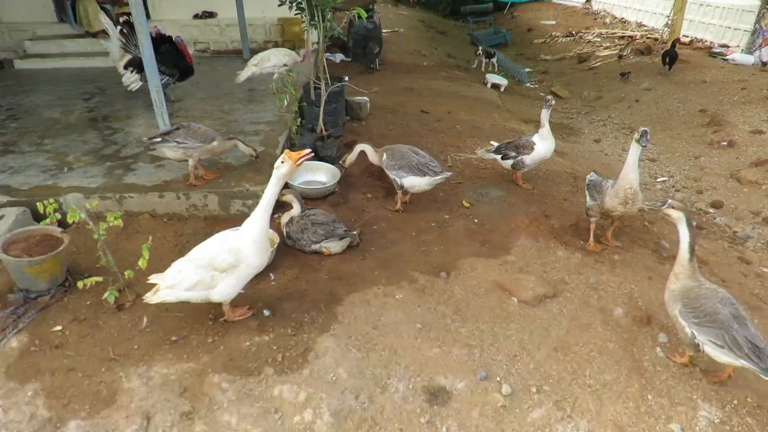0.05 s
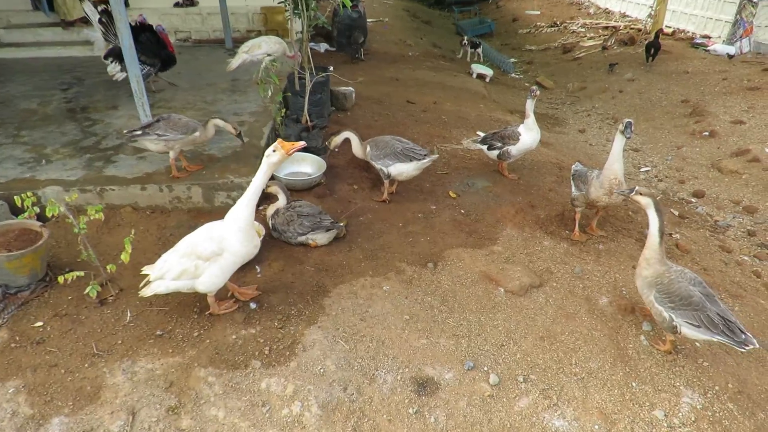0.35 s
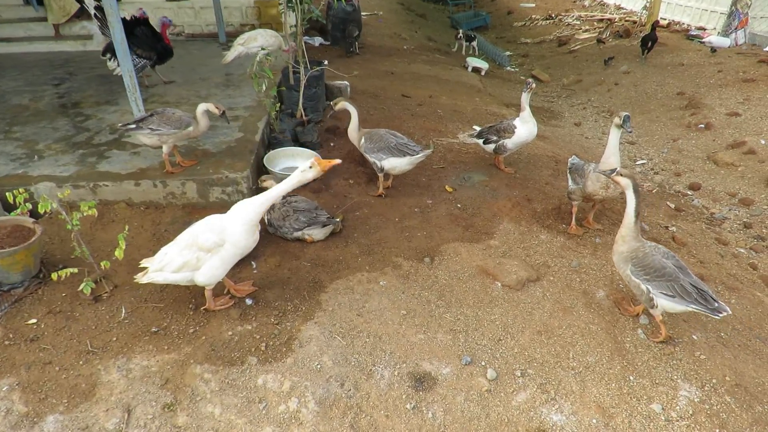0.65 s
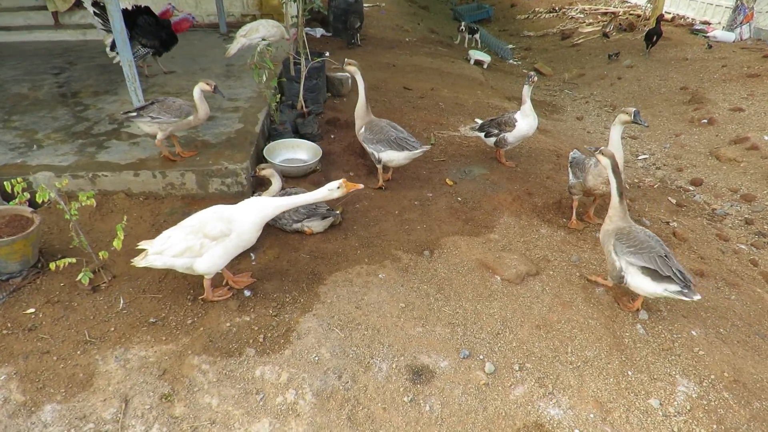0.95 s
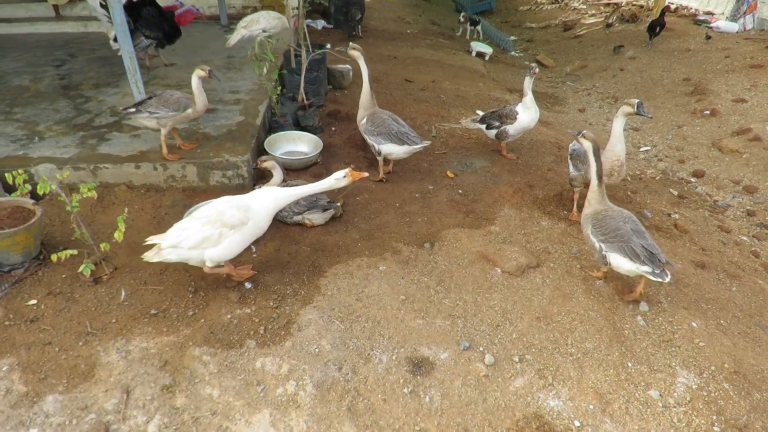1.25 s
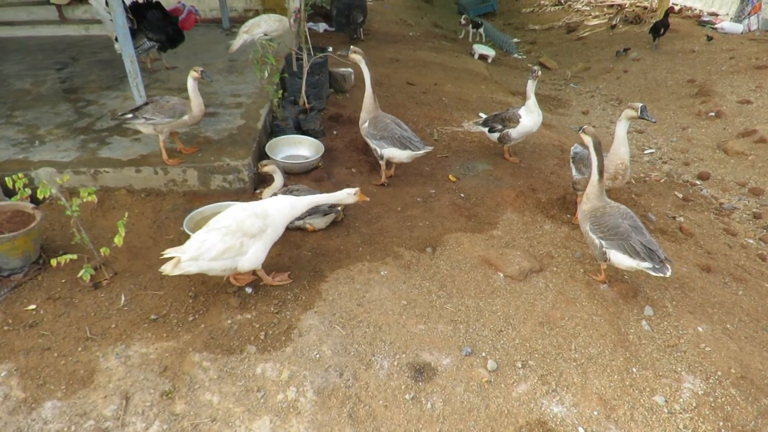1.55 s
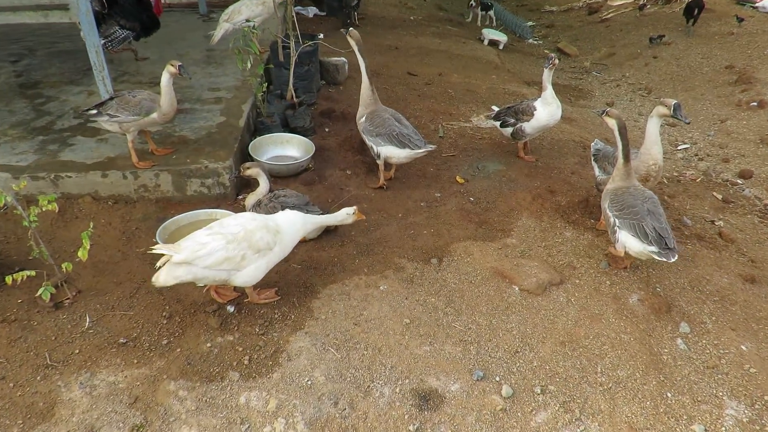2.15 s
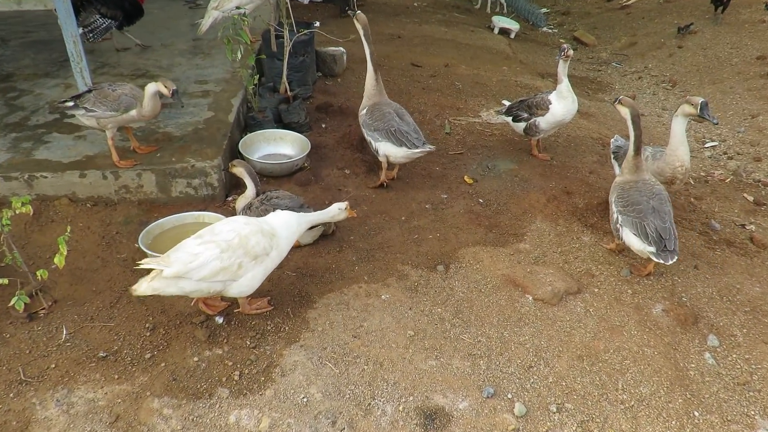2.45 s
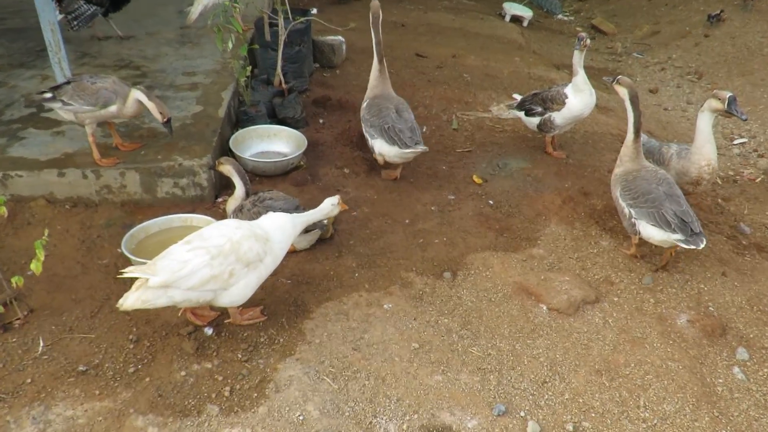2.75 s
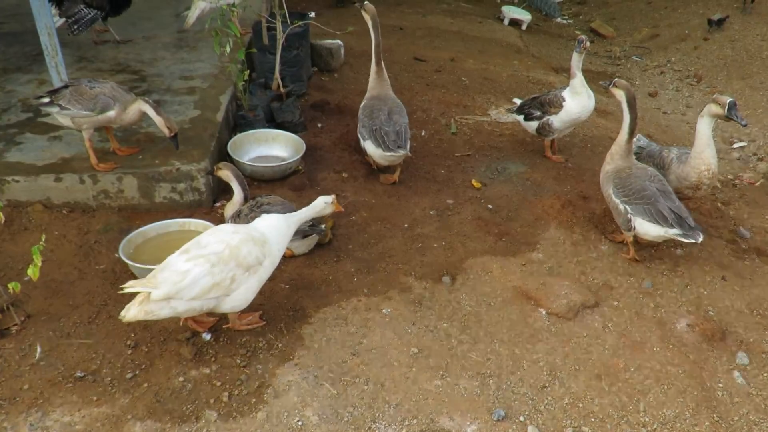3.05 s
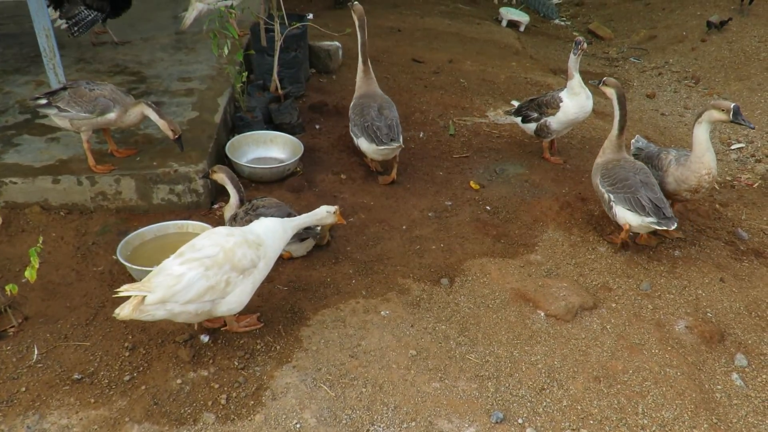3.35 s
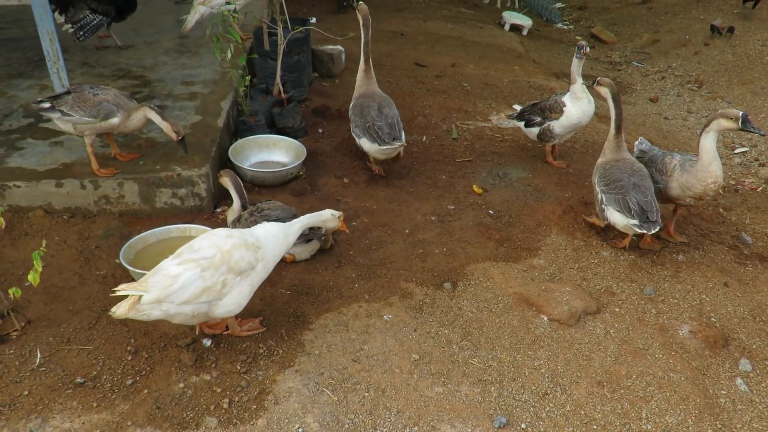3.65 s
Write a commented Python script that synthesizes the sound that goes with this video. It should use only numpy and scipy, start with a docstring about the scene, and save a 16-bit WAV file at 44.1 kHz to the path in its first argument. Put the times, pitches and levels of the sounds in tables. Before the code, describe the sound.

Geese quarrel a few metres away over a low farmyard hum. A grunt breaks into a shriek, clearing to a honk at 0.6 seconds, then a rasp and soft clucks until 1.4. A thin squeak at 1.7 opens a wheezy hiss lasting until 3.3. Hoarse honks come at 2.1 and 3.2 seconds, with two short peeps between them. A small bird whistles faintly twice near the end.

```python
"""Geese quarrel a few metres away, over the murmur and low hum of a farmyard. One grunts, breaks into
a shriek that clears to a honk, and trails off in a rasp and soft clucks: membrane pulses and puffs of air
ringing in the throat. A thin squeak opens a long wheezy hiss, air rushing through an open beak.
A hoarse honk sounds over it, two short peeps cut through, and a second hoarse honk comes as the hiss dies.
A small bird whistles at the end."""
import sys
import numpy as np
from scipy import signal
from scipy.fft import rfft, irfft
from scipy.io import wavfile
from scipy.ndimage import uniform_filter1d, map_coordinates

SR = 44100
rng = np.random.default_rng(int(sys.argv[2]) if len(sys.argv) > 2 else 0)


def wrap_up_sound(samples):
    """Save the sound to the file named by the first command line argument, as 16-bit audio."""
    columns = np.atleast_2d(samples).T
    # keep every value between -1 and 1, then stretch to whole-number steps
    tamed = np.clip(columns, -1, 1)
    steps = np.round(tamed * 32767).astype(np.int16)
    wavfile.write(sys.argv[1], SR, steps)


N = 171990
T = np.arange(N) / SR
TOP_HZ = 15400


def amp(db):
    """Decibels to gain."""
    return 10 ** (np.asarray(db) / 20)


def unit(x):
    """Scales to rms 1."""
    return x / np.sqrt(np.mean(x ** 2) + 1e-20)


def read(points, hz):
    """Reads a curve on a log-frequency axis."""
    f, value = np.transpose(points)
    return np.interp(np.log(hz + 1), np.log(f + 1), value)


def follow(rows, fade_s=0.0045):
    """Breakpoints to automation: the times spanned, a soft-ended gate and a curve per column."""
    s, *columns = np.transpose(rows)
    t = np.arange(s[0], s[-1], 1 / SR)
    gate = np.clip(np.minimum(t - t[0], t[-1] - t) / fade_s, 0, 1)
    return t, gate, *[np.interp(t, s, c) for c in columns]


def place(t, sound):
    """Sets a sound at its time in silence."""
    return np.pad(sound, (max(round(t[0] * SR), 0), N))[:N]


def wander(size, hz):
    """Random modulation of rms about 1, rolling off above the given rate."""
    z = rfft(rng.standard_normal(SR * 2))
    bin_hz = np.arange(len(z)) / 2
    return unit(irfft(z / (1 + (bin_hz / hz) ** 4)))[:size]


def colour(x, eq):
    """Minimum-phase EQ; the result has rms 1."""
    log_gain = np.log(amp(read(eq, abs(np.fft.fftfreq(4096, 1 / SR)))))
    taps = np.fft.ifft(np.exp(np.conj(signal.hilbert(log_gain)))).real
    return unit(signal.fftconvolve(x, taps[:len(taps) // 2])[:len(x)])


def resonate(x, hz, width_hz):
    """A steep resonance at hz, fixed or gliding."""
    carrier = np.exp(2j * np.pi * np.cumsum(hz * np.ones(len(x))) / SR)
    r = np.exp(-np.pi * width_hz / SR)
    return unit((carrier * signal.lfilter([1], [1, -2 * r, r * r], x / carrier)).real)


def mouth(x, throat, hz, rough, tracking=0.36, drift=0.063):
    """Throat colour whose resonances partly follow the pitch and drift when the voice is rough."""
    n = np.arange(len(x))
    clock = np.cumsum((hz / hz.mean()) ** tracking * (1 + drift * rough * wander(len(x), 28)))
    # Warp time, filter, warp back: only the resonances move.
    warped = map_coordinates(x, [np.interp(np.arange(clock[-1]), clock, n)], order=5)
    return map_coordinates(colour(warped, throat), [clock], order=5)


def voice(rows, throat, air, jitter=1.0, breathy_hz=3000):
    """Uneven membrane pulses, each with a puff of air, ring in the throat; the treble is smeared."""
    puff_cycles, smear_s, smear_db = 0.73, 0.006, 1
    t, gate, hz, db, rough = follow(rows)
    cycles = np.cumsum(hz * (1 + jitter * 0.0483 * rough * wander(len(t), 120))) / SR
    phase = cycles % 1 - .5
    terms = 2 * int(TOP_HZ / hz.max()) + 1  # band-limits the pulses
    pulses = unit(np.sinc(terms * phase) / np.sinc(phase) - 1 / terms)
    puffs = unit(np.exp(-(phase % 1) / puff_cycles) * rng.standard_normal(len(t)))
    body = signal.sosfiltfilt(signal.butter(2, breathy_hz, fs=SR, output="sos"), pulses)
    smear = rng.standard_normal(SR // 50) * np.exp(-T[:SR // 50] / smear_s)
    treble = signal.fftconvolve(pulses - body, smear / np.linalg.norm(smear))[:len(t)]
    drive = (1 - rough) * (body + amp(smear_db) * treble) + air * rough * puffs
    flutter = 1 + 0.5 * rough * np.tanh(wander(len(t), 72))
    return place(t, gate * amp(db) * mouth(drive * flutter, throat, hz, rough))


def tone(rows, partials, waver, shake=0.18, bright_db=0):
    """A clear note: pitch wavers, level shakes, and any partials above the second flicker."""
    t, gate, hz, db = follow(rows)
    phase = 2 * np.pi * np.cumsum(hz * (1 + waver * wander(len(t), 110))) / SR
    count = max(int(partials[-1][0] / hz.mean()), 1)
    note = 0
    for k in range(1, count + 1):
        flicker_db = 3 * wander(len(t), 45) if k > 2 else 0
        gain = amp(read(partials, k * hz.mean()) + flicker_db + bright_db * (k > 1))
        note += gain * np.sin(k * phase + 2 * np.pi * rng.random())
    return place(t, gate * amp(db) * unit(note) * (1 + shake * wander(len(t), 89)))


def turbulence(x, depth_db, full_hz=2150):
    """Narrow bands swell and fade on their own, most deeply above full_hz."""
    hz, _, z = signal.stft(x, SR, nperseg=512)
    bands = uniform_filter1d(rng.standard_normal(z.shape), size=4, axis=0)
    swells = unit(uniform_filter1d(bands, size=12, axis=1))
    share = np.minimum(hz / full_hz, 1)[:, None]
    return signal.istft(z * amp(depth_db * share * swells), nperseg=512)[1][:len(x)]


# EQ of the background beds: freq_hz, gain_db
WASH_EQ = [(25, -48), (80, -7), (160, 4.5), (330, -6), (950, 2.5), (1400, -3.5), (2500, -16), (4000, -20.5),
           (15000, -56)]
RUMBLE_EQ = [(22, -47.5), (50, -14), (90, -1.5), (150, -9), (230, -4.5), (400, -12), (1000, -79.5)]
# Their fader rides: time_s, level_db
WASH_FADER = [(.08, -28), (.25, -27.5), (.35, -40), (1.5, -40.5), (1.95, -31.5), (3.5, -28), (3.9, -31)]
RUMBLE_FADER = [(.08, -37), (.25, -31.5), (.36, -55), (1.5, -42), (2.1, -41), (3, -34)]
HUM_FADER = [(.08, -40), (.4, -51.5), (1.5, -57.5), (2.001, -41.5), (2.8, -45.5), (3.4, -34), (3.6, -30),
             (3.9, -39.5)]


def yard():
    """Distant wash, partly different at each ear, over a low rumble and a wavering hum."""
    mid, low, drone, side = rng.standard_normal((4, N))
    wash = colour(mid, WASH_EQ) + amp(-12) * colour(side, WASH_EQ) * np.array([[1], [-1]])
    hum = resonate(drone, hz=171.3, width_hz=27)
    layers = [(wash, WASH_FADER), (colour(low, RUMBLE_EQ), RUMBLE_FADER), (hum, HUM_FADER)]
    return sum(x * amp(np.interp(T, *np.transpose(fader))) for x, fader in layers)


# Opening grunt: time_s, pitch_hz, level_db, roughness (0-1)
GRUNT = [(.082, 152, -21, 0.22), (.122, 154.7, -22, 0.08), (.2, 158.4, -19, 0.17),
         (.245, 158.1, -14.5, 0.31), (.29, 158, -30.5, 0.5)]
# Its throat: freq_hz, gain_db
GRUNT_THROAT = [(155, -7.5), (310, -28), (470, -9.5), (630, 2), (785, -14), (940, -1.5), (1100, 2.5),
                (1260, -22), (1570, 0), (1730, 3), (1880, -49), (2030, -13), (2200, -4.5), (2360, -39),
                (2700, -18.5), (2980, -26.5), (3140, -5.5), (3350, -29.5), (3680, -7), (4000, -24),
                (4700, -19.5), (5900, -40), (7400, -39.5), (12000, -104)]


def grunt():
    """Low, fairly even pulses with little breath."""
    return voice(GRUNT, GRUNT_THROAT, air=0.59, jitter=0.5, breathy_hz=4950)


# Rough layer of the shriek: time_s, pitch_hz, level_db, roughness (0-1)
SHRIEK = [(.229, 212.8, -14, 0.45), (.25, 209.7, -15.5, 0.95), (.285, 220.4, -19.5, 0.41),
          (.36, 215.8, -25, 0.37), (.44, 217.4, -21, 0.31), (.51, 220.6, -22, 0.37),
          (.555, 232.3, -24, 0.8), (.585, 211.4, -44, 0.46)]
# Its throat: freq_hz, gain_db
SHRIEK_THROAT = [(150, -28.5), (650, -27.5), (950, -15), (1100, -4), (1300, 7.5), (1530, -4.5), (1740, 0.5),
                 (1950, -16.5), (2450, -24.5), (2850, -9), (3300, -16), (4400, -18.5), (5400, -22),
                 (6800, -31), (8300, -33.5), (15000, -66.5)]
# Piercing core and the clear line under it: time_s, pitch_hz, level_db
SHRIEK_CORE = [(.25, 1570, -29.5), (.27, 1548, -10.5), (.31, 1520, -14.5), (.355, 1500, -11),
               (.395, 1507, -24.5), (.51, 1529, -28.5), (.548, 1550, -10.5), (.572, 1653, -29)]
SHRIEK_ROOT = [(.25, 795, -32.5), (.4, 821, -29), (.565, 836, -29)]


def shriek():
    """A rough, turbulent cry with two clear notes about an octave apart."""
    cry = voice(SHRIEK, SHRIEK_THROAT, air=.8, jitter=1.1, breathy_hz=4000)
    core = tone(SHRIEK_CORE, [(1500, 0)], waver=0.0056, shake=0.23)
    root_eq = [(800, -2.5), (1600, -8), (2450, -9.5), (3300, -23.5), (4300, -12.5), (7000, -32.5)]
    root = tone(SHRIEK_ROOT, root_eq, waver=0.012, shake=0.21)
    return turbulence(cry, depth_db=3) + core + root


# Air accents at both ends of the shriek: peak_s, half_length_s, level_db
SPITS = [(0.257, 0.016, -19.5), (0.565, 0.021, -23)]
# Their EQ: freq_hz, gain_db
SPIT_EQ = [(300, -31.5), (1000, 7.5), (2100, 17), (3200, 7.5), (4600, 10), (9500, -21.5), (11500, -19),
           (15000, -47)]


def spits():
    """Air spits out as the voice breaks."""
    bursts = sum(amp(db) * np.exp(-((T - peak_s) / half_s) ** 2) for peak_s, half_s, db in SPITS)
    return bursts * colour(rng.standard_normal(N), SPIT_EQ)


# Clear honk: time_s, pitch_hz, level_db, roughness (0-1)
HONK = [(.56, 810, -26, 0.15), (.575, 817.4, -14, .06), (.6, 817, -14.5, 0.033), (.638, 787, -18.5, .06),
        (.66, 754, -37, 0.36)]
# Its throat: freq_hz, gain_db
HONK_THROAT = [(400, -25), (810, 4.5), (1620, 3), (2450, -0.5), (3280, -3), (4100, -10), (4900, -19),
               (8000, -34), (14000, -55.5)]
# Its falling tail: time_s, pitch_hz, level_db
HONK_TAIL = [(.645, 1590, -21.5), (.675, 1523, -27.5), (.7, 1474, -25.5), (.735, 1450, -31)]


def honk():
    """Fast, even pulses make a clear note that trails off an octave higher."""
    call = voice(HONK, HONK_THROAT, air=1.3, breathy_hz=7000)
    return call + tone(HONK_TAIL, [(1500, 0), (3000, -9), (4000, -30)], waver=.028, shake=.4)


# Rasp under the clucks: time_s, pitch_hz, level_db, roughness (0-1)
RASP = [(.64, 191, -32, 0.3), (.72, 170.7, -24.5, 0.36), (.765, 179, -24, 0.4), (.8, 181.3, -28.5, 0.28),
        (.86, 181.1, -24.5, 0.32), (.915, 180.8, -19, 0.34), (.955, 177.4, -26.5, 0.36),
        (1.02, 169.7, -40, 0.35), (1.14, 172, -39.5, .7), (1.22, 162, -42, .7)]
# Its throat: freq_hz, gain_db
RASP_THROAT = [(150, -12), (400, -35.5), (680, -5), (900, -20), (1400, 3.5), (1700, -17.5), (2100, -9.5),
               (2500, -28.5), (2800, -18), (3500, -18.5), (4400, -30), (5500, -30), (8000, -55.5),
               (14000, -56)]


def rasp():
    """The voice sinks to low, breathy pulses."""
    return turbulence(voice(RASP, RASP_THROAT, air=.8), depth_db=3)


# Run of clucks: start_s, length_s, pitch_hz, level_db, overtone_lift_db
CLUCKS = [(0.748, 0.049, 674, -20, 5.5), (0.774, 0.036, 668, -19.5, -3.5), (0.821, 0.055, 659, -25.5, -10),
          (0.886, 0.023, 677, -14, 4), (0.944, 0.039, 683, -13.5, -0.5), (0.969, 0.034, 675, -13, -7),
          (0.996, 0.071, 658, -26.5, -3), (1.055, 0.03, 767, -21.5, -4), (1.077, 0.031, 598, -27, 0.5),
          (1.118, 0.038, 685, -20.5, 3.5), (1.145, 0.038, 673, -14.5, -7), (1.168, 0.035, 615, -26, 1),
          (1.249, 0.041, 618, -31, -9), (1.331, 0.049, 596, -25.5, -17)]
# Their partials: freq_hz, gain_db
CLUCK_EQ = [(670, -1.5), (1350, -6.5), (2000, -22), (2800, -31.5), (4200, -34.5), (6200, -41.5),
            (15000, -76)]


def cluck(start_s, length_s, hz, db, bright_db):
    """A short soft note whose pitch and level rise and fall in one arch; an open beak brightens it."""
    progress = np.linspace(0, 1, 9)
    sag = 1 - np.sin(np.pi * progress)
    rows = np.transpose([start_s + length_s * progress, hz * (1 - 0.054 * sag), db - 12.5 * sag])
    return tone(rows, CLUCK_EQ, waver=0.017, bright_db=bright_db)


def wheeze(noise, hz, width_hz):
    """Air in a narrow resonance, its slow swings evened out as in a sustained whistle."""
    band = resonate(noise, hz, width_hz)
    return unit(band / np.sqrt(abs(uniform_filter1d(band ** 2, size=700)) + 0.041))


# Hiss automation: time_s, throat_hz, throat_db, beak_hz, beak_db, air_db
HISS = [(1.55, 1046, -48, 2400, -76, -57), (1.72, 1136, -32.5, 2400, -74, -39.5),
        (1.83, 1112, -45, 2540, -58, -41), (1.89, 1100, -35.5, 2480, -36, -36.5),
        (2.08, 1125, -32.5, 2250, -37.5, -34.5), (2.36, 1143, -27.5, 2140, -38, -21.5),
        (2.45, 1153, -19, 2400, -27, -28.5), (2.5, 1250, -40, 2552, -28, -26),
        (2.54, 1240, -30, 2554, -20.5, -27.5), (2.7, 1233, -21.5, 2460, -26, -28.5),
        (2.88, 1228, -21.5, 2380, -27.5, -24), (2.99, 1165, -18.5, 2270, -26.5, -25),
        (3.04, 1150, -15.5, 2180, -21.5, -24), (3.09, 1148, -21.5, 2410, -27, -23),
        (3.2, 1139, -28, 2560, -32.5, -28), (3.28, 1110, -35, 2510, -50, -52)]
# EQ of the rushing air: freq_hz, gain_db
AIR_EQ = [(200, -28), (650, -6.5), (1000, -1.5), (1450, 11.5), (1850, -2.5), (2500, -5), (3500, -4),
          (4400, -7.5), (5000, -7.5), (6500, -19), (8000, -24.5), (15000, -47)]


def hiss():
    """Air rushes through the open beak and wheezes in three gliding, fluttering resonances."""
    t, gate, throat_hz, throat_db, beak_hz, beak_db, air_db = follow(HISS)
    noise = rng.standard_normal((4, len(t)))
    flutter_db = 3 * wander(len(t), 25)
    throat = amp(throat_db + flutter_db) * wheeze(noise[0], throat_hz, width_hz=64)
    beak = amp(beak_db) * wheeze(noise[1], beak_hz, width_hz=190)
    upper = amp(-10) * resonate(noise[2], 2.7 * throat_hz, width_hz=950)
    air = amp(air_db) * turbulence(colour(noise[3], AIR_EQ) + upper, depth_db=2.6)
    tremble = 1 + 0.061 * wander(len(t), 47)
    return place(t, gate * (throat + beak + air) * tremble)


# Squeak at the head of the hiss: time_s, pitch_hz, level_db
SQUEAK = [(1.66, 1117, -43), (1.72, 1115, -26), (1.765, 1125, -19.5), (1.82, 1096, -24), (1.835, 1080, -46)]
# Its partials: freq_hz, gain_db
SQUEAK_EQ = [(1100, 5), (2230, -10.5), (4450, -27.5), (8000, -62)]


def squeak():
    """A thin note that swells, then droops in pitch as it ends."""
    return tone(SQUEAK, SQUEAK_EQ, waver=0.0046)


# Hoarse honks, one list each: time_s, pitch_hz, level_db, roughness (0-1)
HOARSE_HONKS = [
    [(2.1, 154.8, -27.5, 0.64), (2.15, 160, -18.5, 0.27), (2.21, 174.5, -18.5, 0.15),
     (2.31, 168.7, -15.5, 0.16), (2.36, 179.6, -14.5, 0.49), (2.395, 178.8, -14, 0.41),
     (2.43, 161.6, -20.5, 0.43), (2.49, 147, -22, 0.99)],
    [(3.22, 153.9, -25.5, 0.61), (3.27, 157.5, -17, 0.38), (3.33, 161.8, -15.5, 0.53),
     (3.4, 165.5, -14.5, 0.35), (3.48, 170.7, -15, 0.4), (3.54, 169.1, -16.5, 0.38),
     (3.6, 156.8, -25, 0.25), (3.65, 155, -44, 0.37)],
]
# A throat for each: freq_hz, gain_db
HOARSE_THROATS = [
    [(170, -10.5), (340, -30.5), (520, -15), (690, 1.5), (800, -4), (1000, -28.5), (1390, 7.5), (1750, -16),
     (2300, -10.5), (3050, -23), (4800, -25), (7500, -51), (15000, -71)],
    [(170, -18), (340, -29.5), (520, -11.5), (680, 3.5), (830, -19), (1020, -20.5), (1380, 7.5),
     (1800, -24), (2100, -10), (2500, -35.5), (2800, -12), (3050, -28.5), (3450, -14), (3800, -27),
     (4850, -26), (7500, -47.5), (15000, -61)],
]
# Pitch scatter of each: jitter (factor)
HOARSE_JITTER = [0.856, 1.0]


def hoarse_honks():
    """Two low calls of ragged pulses and turbulent breath."""
    return sum(turbulence(voice(rows, throat, air=.9, jitter=jitter, breathy_hz=4000), depth_db=1.5)
               for rows, throat, jitter in zip(HOARSE_HONKS, HOARSE_THROATS, HOARSE_JITTER))


# Peeps, one list each: time_s, pitch_hz, level_db
PEEPS = [
    [(2.49, 1650, -37), (2.53, 2030, -33), (2.58, 1700, -37)],
    [(2.83, 1510, -42), (2.87, 1990, -25.5), (2.91, 1650, -41)],
]


def peeps():
    """Two short arching whistles cut through the hiss."""
    return sum(tone(rows, [(2000, 6), (4000, -20)], waver=0.02, shake=0.26) for rows in PEEPS)


# Bird notes, one list each: time_s, pitch_hz, level_db
BIRD_NOTES = [
    [(3.59, 4750, -52), (3.67, 4500, -44.5), (3.705, 4080, -42), (3.735, 3120, -47)],
    [(3.835, 5380, -55), (3.9, 5200, -49)],
]


def bird():
    """A small bird whistles two faint, pure, falling notes."""
    return sum(tone(rows, [(5400, 0)], waver=0.0074) for rows in BIRD_NOTES)


# Reverb time of the yard: freq_hz, t60_s
ECHO_DECAY = [(150, 0.19), (1000, 0.45), (4000, 0.22), (12000, 0.03)]


def echoes(send):
    """Ground and walls scatter a short tail, different at each ear."""
    taps = rng.standard_normal((2, SR // 2)) * (rng.random((2, SR // 2)) < .05)
    hz, t, z = signal.stft(taps, SR, nperseg=256)
    decay = amp(-60 * t / read(ECHO_DECAY, hz)[:, None])
    tail = signal.istft(z * decay, SR, nperseg=256)[1]
    return signal.fftconvolve(send[None], tail / np.linalg.norm(tail[0]), axes=1)[:, :N]


def scene():
    """Mixes the calls over the yard: near voices are driest, the clucks get the most echo."""
    near = grunt() + hoarse_honks()
    far = shriek() + spits() + honk() + rasp() + hiss() + squeak() + peeps() + bird()
    clucks = sum(cluck(*row) for row in CLUCKS)
    send = amp(-20) * near + amp(-18) * far + amp(-14) * clucks
    return yard() + near + far + clucks + echoes(send)


# Stereo balance: freq_hz, left_minus_right_db
STEREO_LEAN = [(160, -0.1), (290, -4.5), (640, 1), (1400, 0.8), (3000, 0)]


def record(dry):
    """Master: a slight left-right colour, a near-silent lead-in, quick fades and a low-pass."""
    start_s, fade_in_s, fade_out_s = .082, 0.00098, 0.002
    lean_db = read(STEREO_LEAN, np.fft.rfftfreq(N, 1 / SR)) * np.array([[.5], [-.5]])
    leaned = irfft(rfft(dry) * amp(lean_db), N)
    fade_in = np.clip((T - start_s) / fade_in_s, amp(-68), 1)
    fade_out = np.clip((T[-1] - T) / fade_out_s, 0, 1)
    lowpass = signal.firwin(511, TOP_HZ, window=("kaiser", 9), fs=SR)
    return signal.oaconvolve(leaned * fade_in * fade_out, lowpass[None], "same")


dry = scene()
out = record(dry)
wrap_up_sound(out)
```